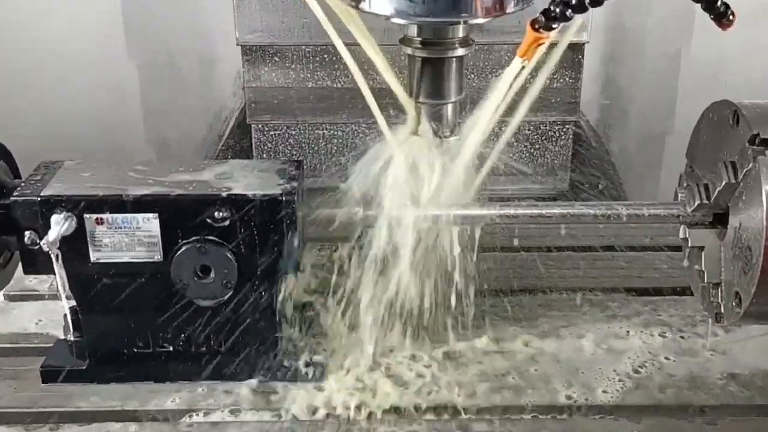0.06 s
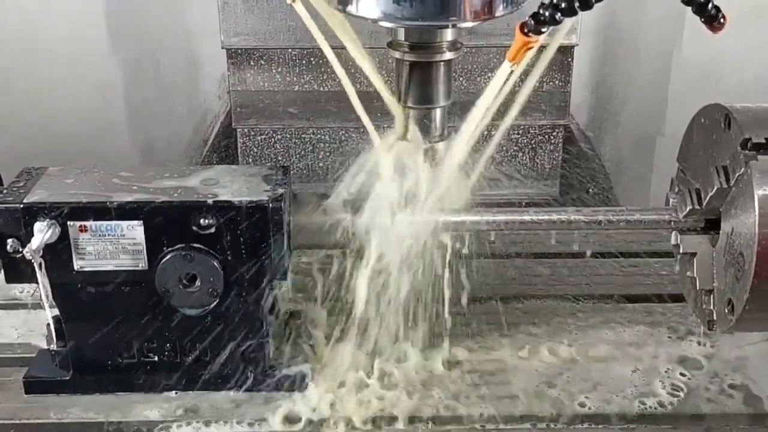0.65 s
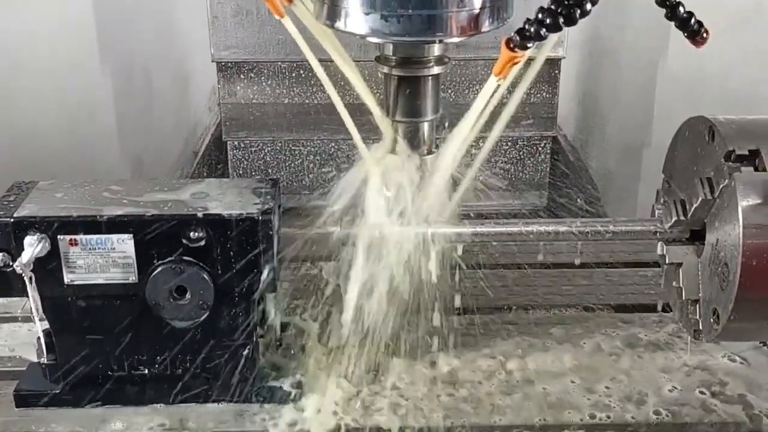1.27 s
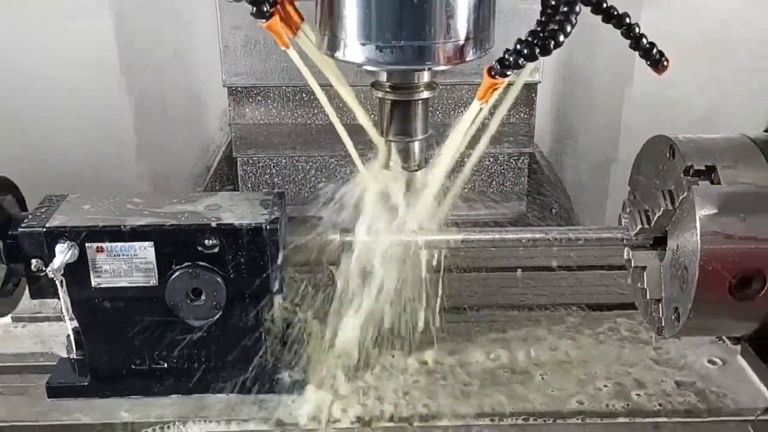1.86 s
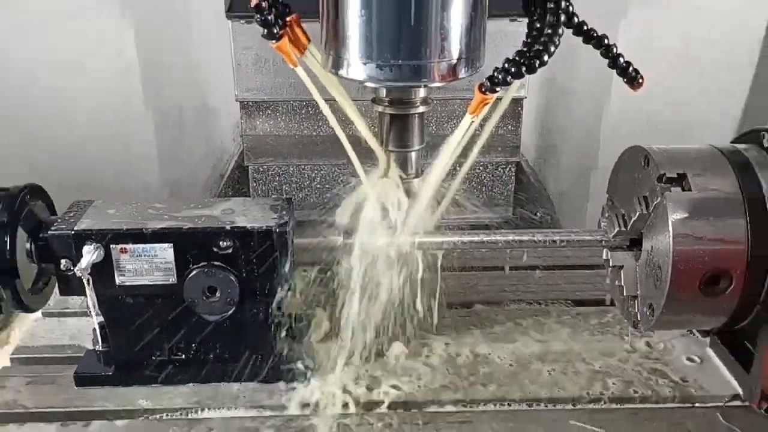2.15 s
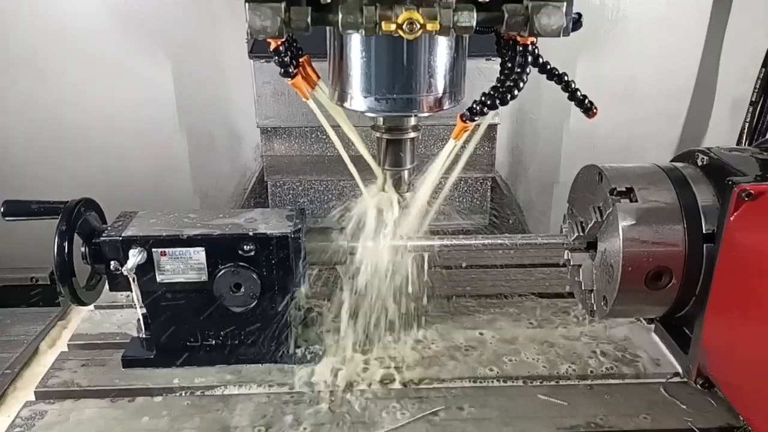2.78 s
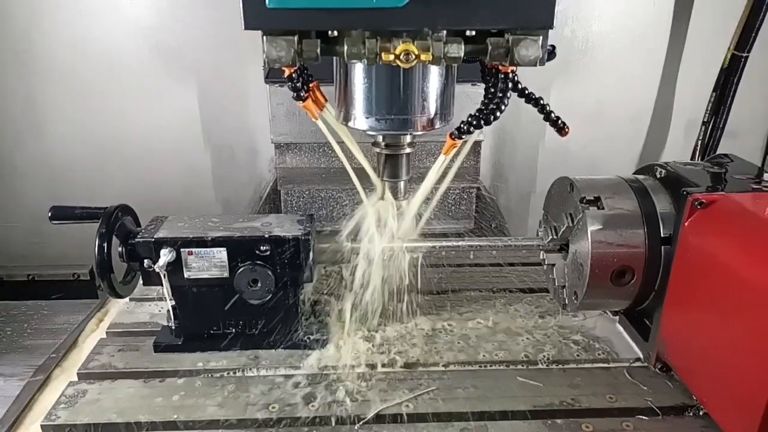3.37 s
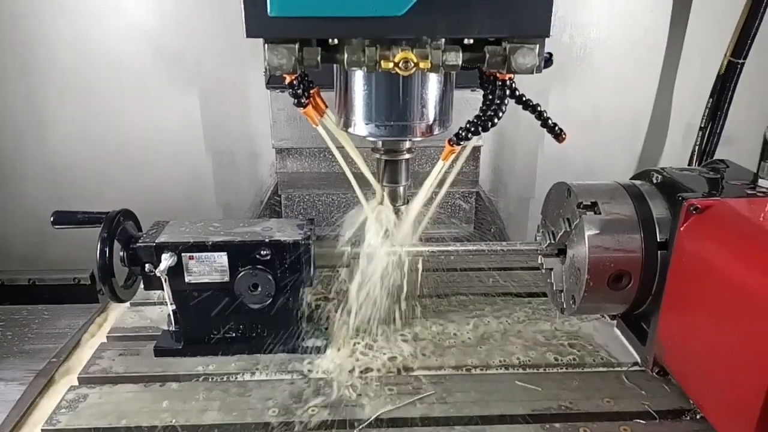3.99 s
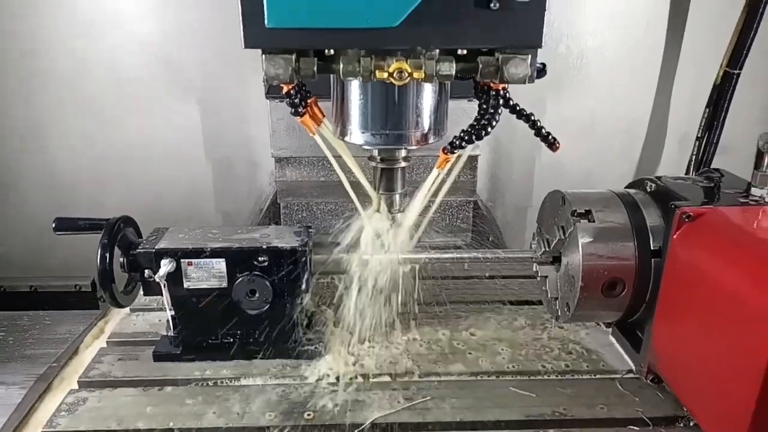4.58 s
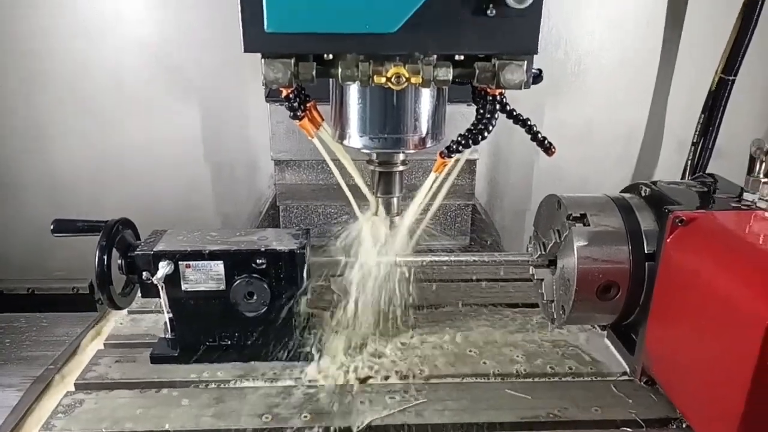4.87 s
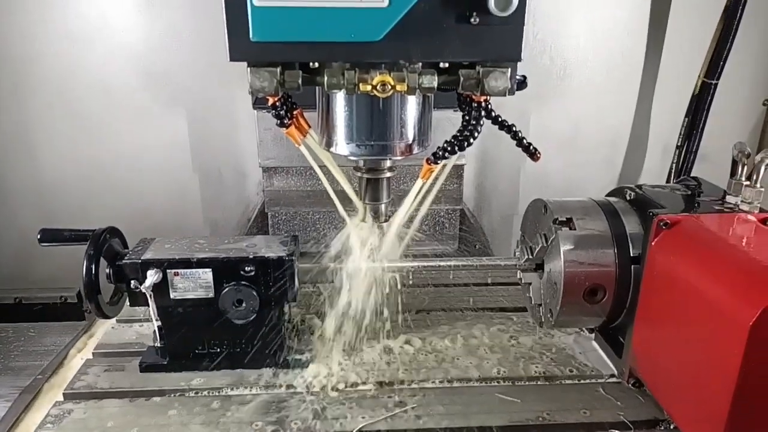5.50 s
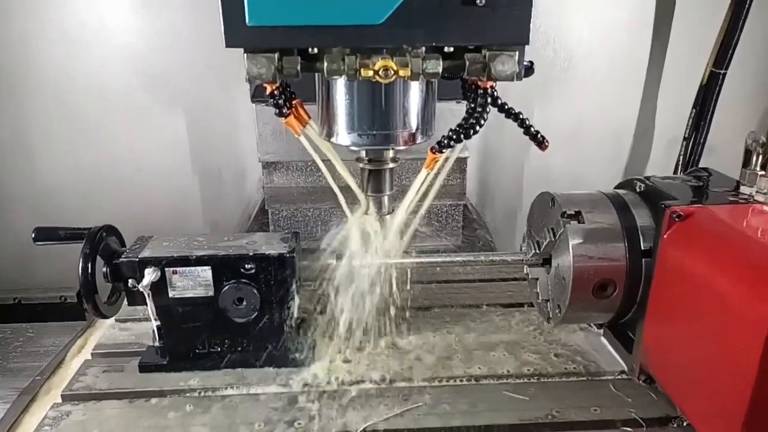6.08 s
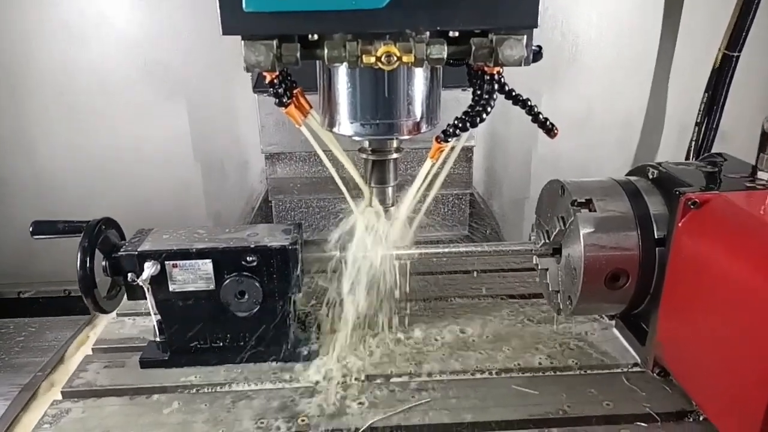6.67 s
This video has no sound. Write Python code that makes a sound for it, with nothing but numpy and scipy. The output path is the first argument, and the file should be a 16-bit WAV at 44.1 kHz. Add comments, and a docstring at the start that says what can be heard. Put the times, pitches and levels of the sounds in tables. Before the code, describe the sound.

Coolant jets hiss and splash on steel over a milling machine's hum, while the cutter adds a rough, high whistle midway.

```python
"""Just outside the open cabinet of a machining centre milling a steel shaft under flood coolant.
The jets hiss, patter and splash on steel; runoff bubbles in the pool and drums on the sheet-metal tray.
Midway the cutter bites: its teeth ring tool and shaft into a rough whistle, blurred by reflections.
Underneath, the pump drones and beats, the motors whine and the frame rumbles."""
import sys
import numpy as np
from scipy import signal
from scipy.fft import rfft, irfft
from scipy.io import wavfile
from scipy.ndimage import uniform_filter1d

SR = 44100
rng = np.random.default_rng(int(sys.argv[2]) if len(sys.argv) > 2 else 0)


def put_to_file(sound):
    """Save the sound as 16-bit audio at rate SR, in the file named by the first command-line argument."""
    columns = np.atleast_2d(sound).T  # one column per channel
    safe = np.clip(columns, -1, 1)
    whole_steps = np.round(safe * 32767)
    wavfile.write(sys.argv[1], SR, whole_steps.astype(np.int16))


N = 297234
TIME = np.arange(N) / SR
FREQS = np.maximum(np.fft.rfftfreq(N, 1 / SR), 1)
TOOTH_HZ = 40.0
TRICKLE_DB = -63.5  # runoff between gushes, before the tray's gain


def spray(flow_db, gain_db=-34.5, treble_hz=9000, follow=0.84, flow_cap_db=6):
    """Fine droplets burst off the spinning tool in a dense, sputtering hiss."""
    # spray spectrum, each side: freq_hz, gain_db
    left_spectrum = [(150, -66), (900, -36), (2000, -6.5), (3400, 3), (4700, -1), (6300, -1), (7300, -1.5),
                     (8600, 1), (10200, -3), (12500, -4), (14500, 0), (15800, -2.5)]
    right_spectrum = [(900, -76), (2000, -11.5), (3400, 3.5), (4700, -1), (6400, 2.5), (7300, -0.5),
                      (8500, -13.5), (10000, -79), (12500, -71), (14500, -1.5), (15800, -16)]
    # top of the hiss dulls as the listener moves back: time_s, gain_db
    treble_gain = [(0, 0.5), (2.5, -1), (3.5, -1), (5.0, -4.5), (6.74, -5)]
    left, right = cabinet(drops(per_s=7500, spread_db=2.5), t60_s=0.097, wet_db=3)
    hiss = unit(np.array([colour(left, left_spectrum), colour(right, right_spectrum)]))
    treble = irfft(rfft(hiss) / (1 + (treble_hz / FREQS) ** 6), N)
    level = undb(gain_db + follow * np.minimum(flow_db, flow_cap_db))
    return (hiss + treble * (undb(curve(treble_gain)) - 1)) * level


def patter(flow_db):
    """Heavier drops slap on shaft and table; long waves reach both sides alike."""
    # drops on steel: freq_hz, gain_db
    spectrum = [(150, -37), (300, 15.5), (420, 4), (470, -4), (560, 7.5), (720, 1.5), (840, 1.5),
                (1100, 7.5), (1250, 4.5), (1370, 6.5), (1520, 5), (2400, 5), (3400, -6), (7000, -7.5)]
    # left-right likeness: freq_hz, correlation
    likeness = [(200, 1), (550, 0.36), (850, -0.071), (1250, -0.072), (1800, -0.14), (2400, 0.48),
                (3400, 0.24)]
    # patter at nominal flow: time_s, level_db
    levels = [(0, -41.5), (2.0, -41.5), (2.7, -43), (2.9, -43), (4.2, -44), (4.6, -43.5), (6.74, -43.5)]
    mid, side = rfft(cabinet(drops(per_s=3000, spread_db=1.5), t60_s=0.14, wet_db=-1.5))
    alike = np.clip(across(likeness), -1, 1)
    mid, side = mid * np.sqrt(1 + alike), side * np.sqrt(1 - alike)
    slaps = irfft(np.array([mid + side, mid - side]), N)
    return unit(colour(slaps, spectrum)) * pan(1.8) * undb(curve(levels) + flow_db)


def flow(waver_db=0.55, sputter_half_s=0.021):
    """Jet strength in dB about nominal: a slight waver and brief sputters."""
    # jets falter (-) or surge (+): time_s, change_db
    sputters = [(0.84, 1.5), (1.25, 2), (1.32, -3.5), (1.59, -2), (1.96, -2.5), (2.13, 1), (2.28, -3.5),
                (2.61, -2.5), (3.12, -1.5), (3.58, 2), (4.09, -1), (4.22, -2.5), (4.33, 1.5), (4.78, -3),
                (5.19, -2), (5.57, -1), (5.78, 2), (6.31, -3)]
    return waver_db * walk(9.7) + sum(db * bump(s, sputter_half_s) for s, db in sputters)


def cutter(gain_db=1.85, fade_s=0.074, squeal_from_db=-45, squeal_full_db=-36):
    """A light cut rasps the tool; a heavy one locks it into a squeal that pulses at every tooth."""
    # chatter as the tool enters, crosses and leaves the steel: time_s, level_db
    chatter = [(1.7, -56), (1.92, -51.5), (2.05, -43.5), (2.19, -46.1), (2.28, -39.5), (2.38, -47.1),
               (2.48, -33.8), (2.59, -42.6), (2.7, -44.5), (2.72, -39.8), (2.8, -36.0), (2.89, -39.6),
               (3.08, -32.1), (3.14, -39.3), (3.41, -32.9), (3.51, -37.0), (3.56, -29.7), (3.69, -36.0),
               (3.71, -32.0), (3.81, -31.0), (3.84, -34.5), (3.86, -30.8), (3.94, -39.6), (3.97, -35.7),
               (4.03, -38.7), (4.06, -35.2), (4.09, -40.7), (4.16, -33.1), (4.19, -40.0), (4.28, -35.7),
               (4.41, -39.1), (4.43, -35.5), (4.49, -38.3), (4.53, -36.3), (4.61, -41.9), (4.69, -34.4),
               (4.8, -39.0), (4.88, -36.8), (4.99, -34.6), (5.06, -37.6), (5.14, -37.6), (5.22, -43.8),
               (5.24, -38.3), (5.34, -44.4), (5.41, -36.4), (5.47, -34.9), (5.51, -40.3), (5.59, -36.1),
               (5.74, -49.0), (5.87, -50.5), (5.95, -58.6)]
    # tool resonance, sagging and recovering with load: time_s, pitch_hz
    pitch = [(2.2, 5429), (2.29, 5433), (2.59, 5414), (2.66, 5437), (2.83, 5420), (2.92, 5431),
             (3.11, 5422), (3.31, 5430), (4.05, 5424), (4.17, 5396), (4.26, 5428), (4.53, 5400),
             (4.63, 5427), (4.73, 5423), (4.92, 5449), (5.04, 5425), (5.59, 5422), (5.69, 5444)]
    chatter_db = curve(chatter)
    locked = np.clip((chatter_db - squeal_from_db) / (squeal_full_db - squeal_from_db), 0, 1)
    tooth = np.cos(2 * np.pi * TOOTH_HZ * TIME)
    turn = np.cos(np.pi * TOOTH_HZ * TIME)  # every other tooth cuts deeper
    voice = settle(locked * whistle() + undb(-6.5) * scrape(width_hz=55))
    carrier = np.exp(2j * np.pi * np.cumsum(curve(pitch)) / SR)
    tool = (voice * carrier).real * undb(locked * (1.5 * tooth + 1.3 * turn))
    engaged = np.clip(np.minimum(TIME - chatter[0][0], chatter[-1][0] - TIME) / fade_s, 0, 1)
    return unit(tool) * pan(-2.4) * engaged * undb(chatter_db + gain_db)


def whistle():
    """Complex envelope of the tool's tone; swirling coolant and reflections make it flutter and waver."""
    sides = [np.exp(1j * (lead_rad + .55 * walk(10) + .35 * walk(45))) * undb(1.5 * walk(40))
             for lead_rad in (0, 1.8)]
    tone = np.array(sides) * np.exp(.55j * walk(26)) * undb(1.3 * walk(70))
    return tone * np.sqrt(2 / np.mean(np.abs(tone) ** 2))


def scrape(width_hz):
    """Complex envelope of a resonance scraped by the teeth; each side gets its own reflections."""
    teeth = undb(3 * np.cos(2 * np.pi * TOOTH_HZ * TIME))
    force = rfft(teeth * rng.standard_normal((2, 2, N)))
    real, imaginary = irfft(force / (1 + 1j * FREQS / width_hz) / (1 + 1j * FREQS / (4 * width_hz)), N)
    return unit(real) + 1j * unit(imaginary)


def settle(ringing, span_s=.05):
    """Self-excited vibration limits itself: slow swings even out, fast roughness stays."""
    power = np.mean(np.abs(ringing) ** 2, axis=0)
    return ringing / np.sqrt(uniform_filter1d(power, int(span_s * SR)))


def shaft(bout_gain_db=3.0, note_hz=3048):
    """The shaft rings along with the cut: grinding bouts in its modes and one thin held note."""
    # bouts in one mode: time_s, pitch_hz, level_db, half_length_s
    bouts = [(2.303, 2985, -44, 0.026), (2.535, 2992, -41.5, 0.04), (2.85, 2990, -45, .03),
             (3.023, 3030, -50, .05), (3.287, 2996, -44, .025), (3.43, 3000, -41, 0.048),
             (3.446, 2410, -49, 0.049), (3.578, 3005, -46, .05), (3.697, 3178, -48, 0.083),
             (3.885, 2990, -42.5, 0.032), (3.94, 3270, -48, 0.1), (4.01, 2998, -40.5, 0.06),
             (4.17, 3000, -43, .035), (4.35, 2360, -50, 0.022), (4.37, 3002, -43, 0.069),
             (4.59, 2990, -44, 0.026), (4.6, 1405, -49, .09), (5.02, 3005, -48, .05),
             (5.263, 3010, -46, 0.045), (5.468, 3035, -47.5, .06)]
    # stretches of the held note: start_s, length_s, level_db
    holds = [(3.3, 0.54, -52), (3.84, 0.6, -46.5), (4.44, 0.22, -51), (4.916, 0.75, -52)]
    modes = sum(undb(db) * bump(s, half_s) * np.exp(2j * np.pi * hz * TIME) for s, hz, db, half_s in bouts)
    ringing = settle(np.exp(.6j * np.array([walk(8), walk(8)])) + .8 * scrape(width_hz=28))
    grind = (ringing * modes).real * undb(3.5 * np.cos(2 * np.pi * TOOTH_HZ * TIME) + 2.2 * walk(30))
    held = sum(undb(db) * gate(start_s, length_s) for start_s, length_s, db in holds)
    note = np.cos(2 * np.pi * note_hz * TIME + .6 * np.array([walk(8), walk(8)])) * undb(2 * walk(20))
    return (grind * undb(bout_gain_db) + held * note) * pan(-0.87)


def tray(runoff_db, gain_db=-0.5):
    """Runoff drums on the sheet-metal tray and rings two low modes."""
    # tray boom: freq_hz, gain_db
    spectrum = [(25, -11), (55, -7), (75, -9), (100, 7), (135, -23), (190, 14.5), (260, 24), (340, 8),
                (450, -8), (650, -32), (900, -37)]
    # drum modes: pitch_hz, width_hz, gain_db
    modes = [(164, 14, 0), (261, 22, -3.5)]
    shared, own = drops(per_s=2000, spread_db=1)[0], drops(per_s=2000, spread_db=1)
    force = shared + undb(-8.5) * own
    boom = unit(colour(force, spectrum)) + undb(-3.5) * unit(ring(force, modes))
    return boom * pan(1.5) * undb(TRICKLE_DB + runoff_db + gain_db)


def runoff():
    """Runoff in dB above its trickle, swelling in gushes."""
    # gushes landing on the tray: start_s, length_s, level_db
    gushes = [(0.027, 0.069, -58), (0.14, 0.1, -53), (0.4, 0.092, -51), (0.82, 0.07, -45),
              (0.89, 0.14, -53), (1.098, 0.055, -49), (1.237, 0.062, -46), (1.386, 0.092, -56),
              (1.49, 0.084, -50.5), (1.726, 0.086, -52), (1.895, 0.19, -52.5), (2.12, 0.15, -52.5),
              (2.298, 0.13, -56), (2.513, 0.087, -54), (2.66, 0.13, -53), (2.828, 0.12, -51),
              (2.983, 0.075, -53), (3.286, 0.052, -54), (3.436, 0.13, -55.5), (3.663, 0.11, -55),
              (3.966, 0.054, -53), (4.15, 0.028, -48), (4.19, 0.048, -51.5), (4.347, 0.106, -53),
              (4.577, 0.1, -48.5), (4.786, 0.1, -58), (4.912, 0.027, -48), (5.14, 0.06, -65),
              (5.274, 0.034, -52), (5.395, 0.046, -51), (5.472, 0.078, -53), (5.677, 0.22, -59.5),
              (5.86, 0.15, -56), (5.997, 0.087, -62), (6.6, 0.043, -53)]
    surge = sum(undb(db - TRICKLE_DB) * gate(start_s, length_s) for start_s, length_s, db in gushes)
    return 20 * np.log10(np.hypot(1, surge))


def splashes():
    """Wads of coolant slap the shaft with a soft, hollow splash."""
    # slaps: time_s, level_db, half_length_s
    slaps = [(0.475, -46, .015), (0.67, -41, 0.014), (1.245, -42, .02), (1.85, -49, 0.034),
             (2.13, -48, .045), (4.33, -53, .02), (4.95, -50, 0.043)]
    # splash spectrum: freq_hz, gain_db
    spectrum = [(900, -23), (1600, -8), (2060, -8), (2230, -10), (2410, -4), (2600, -10), (4000, -29)]
    return bumps(slaps) * unit(colour(drops(per_s=3600, spread_db=-2.0), spectrum))


def glugs(gain_db=-1.0, count=12, spread_oct=.3):
    """An air pocket breaks up in the pool: a quick cluster of like-sized bubbles, strongest midway."""
    # air pockets: time_s, level_db, centre_hz, half_length_s
    pockets = [(0.064, -49, 522, .025), (0.192, -47, 445, 0.026), (0.391, -55, 444, .025),
               (0.513, -51, 440, 0.032), (0.62, -48.5, 443, 0.033), (0.857, -60, 620, .03),
               (1.161, -49, 452, 0.04), (1.268, -48, 440, .025), (1.423, -54, 450, 0.031),
               (1.528, -50, 530, 0.026), (1.76, -51.5, 515, .035), (2.1, -51, 438, 0.029),
               (2.198, -52, 436, 0.032), (2.429, -54, 525, 0.035), (2.55, -53, 515, .025),
               (2.67, -52, 432, 0.031), (2.996, -51, 635, .02), (3.44, -51, 517, 0.026),
               (3.593, -50, 514, 0.023), (3.904, -50, 520, 0.023), (4.33, -56, 443, 0.026),
               (4.456, -54, 620, .025), (4.588, -49.5, 430, 0.028), (4.696, -53, 520, 0.044),
               (4.95, -53, 440, .04), (5.38, -51, 458, 0.027), (5.749, -49.5, 460, 0.027),
               (5.882, -53, 560, 0.037), (5.978, -49.5, 441, .03), (6.104, -52, 453, .025),
               (6.178, -47, 533, 0.016), (6.279, -51, 623, 0.019), (6.43, -53, 630, 0.028),
               (6.568, -47.5, 440, .025), (6.722, -50, 530, .025)]
    out = np.zeros((2, N))
    for time_s, db, hz, half_s in pockets:
        cluster = np.zeros((2, N))
        for slot in np.linspace(-1.5, 1.5, count):
            jitter, pitch, place = rng.uniform(-1, 1, 3)
            offset = slot + jitter / 8
            ping = bubble(hz * 2 ** (spread_oct * pitch)) * np.exp(-offset ** 2 / 2)
            add(cluster, ping * pan(4 * place), time_s + offset * half_s)
        out += cluster * undb(db + gain_db) * np.sqrt(4 * half_s * SR / np.sum(cluster ** 2))
    return out


def gurgle(flow_db, count=800, low_hz=380, high_hz=900, follow=0.52):
    """Small bubbles keep ringing all over the pooled coolant."""
    # fine bubbling at nominal flow: time_s, level_db
    levels = [(0, -56.5), (1.3, -49), (2.7, -52.5), (2.87, -70), (3.27, -62), (3.5, -53), (4.15, -57.5),
              (4.7, -51), (5.2, -56), (5.9, -53), (6.33, -66), (6.7, -53.5)]
    out = np.zeros((2, N))
    for when, pitch, strength, place in rng.random((count, 4)):
        ping = bubble(low_hz * (high_hz / low_hz) ** pitch) * undb(12 * strength)
        add(out, ping * pan(8 * (place - .5)), when * N / SR)
    return unit(out) * undb(curve(levels) + follow * flow_db)


def bubble(hz, cycles=11, glide=0.086):
    """One bubble rings briefly and rises in pitch."""
    t = TIME[:3000]
    age = t * hz / cycles
    return np.sin(2 * np.pi * hz * t * (1 + glide * age / 2)) * np.exp(-2 * age) * (1 - np.exp(-t * hz))


def thumps():
    """The heaviest slugs of coolant shake the whole tray."""
    # slugs: time_s, level_db, half_length_s
    slugs = [(0.95, -55, .04), (1.416, -57, 0.023), (2.05, -48, 0.024), (2.747, -64, 0.028)]
    # thud spectrum: freq_hz, gain_db
    spectrum = [(30, -30), (55, -14), (73, 8), (100, -5), (170, 15), (400, -54)]
    return bumps(slugs) * unit(colour(rng.standard_normal(N), spectrum))


def pump(rough_db=1.0, throb_hz=8.31, throb_db=2.5, throb_peak_s=0.125):
    """Close pump tones beat into a rough drone that throbs evenly and comes in swells."""
    # pump tones: pitch_hz, relative_db
    tones = [(288.1, -5), (292.0, -2), (300.4, 0), (321.2, -9)]
    # drone between swells: time_s, level_db
    levels = [(0, -56), (2.0, -52), (3.6, -54.5), (4.4, -55.5), (5.0, -47), (5.6, -54), (6.5, -52.5)]
    # swells: time_s, level_db, half_length_s
    swells = [(0.102, -43, 0.012), (0.19, -44, 0.0071), (0.387, -40.5, 0.034), (0.62, -49, 0.014),
              (0.852, -38.5, 0.013), (0.944, -45, 0.025), (1.111, -41.5, 0.018), (1.254, -48, 0.017),
              (1.493, -45, 0.016), (1.672, -43, 0.02), (1.826, -47, 0.015), (1.923, -49, 0.02),
              (2.155, -42.5, 0.03), (2.39, -43.5, .024), (2.56, -42, .022), (2.8, -41, 0.012),
              (2.887, -46, 0.012), (3.116, -47, 0.045), (3.455, -45.5, 0.029), (3.708, -42.5, 0.012),
              (3.87, -46, 0.022), (3.963, -46, 0.026), (4.12, -37.5, 0.015), (4.21, -45, 0.041),
              (4.35, -43, 0.029), (4.453, -41, 0.02), (4.6, -42, 0.015), (4.843, -43.5, 0.052),
              (5.175, -45, 0.017), (5.264, -45.5, 0.018), (5.427, -41, 0.014), (5.52, -40.5, 0.025),
              (5.68, -42, 0.017), (5.772, -41, 0.03), (5.912, -38, 0.026), (6.13, -47, 0.071),
              (6.72, -42, 0.012)]
    beating = sum(undb(db) * np.exp(2j * np.pi * (hz * TIME + rng.random())) for hz, db in tones)
    flattened = beating.real / (np.abs(beating) + 0.1) ** .85
    drone = unit(flattened * undb(rough_db * walk(55)))
    throb = undb(curve(levels) + throb_db * np.cos(2 * np.pi * throb_hz * (TIME - throb_peak_s)))
    return drone * pan(1.7) * np.hypot(throb, bumps(swells))


def motors(waver_rad=.25, flutter_db=2.0):
    """Spindle drive and motors give thin, steady whines."""
    # whines: pitch_hz, level_db, left_minus_right_db, left_lead_rad
    whines = [(419.2, -63, 0, .1), (642.4, -64.5, -2, -.7), (963.6, -59.5, 2, -.8),
              (1076.4, -52.5, 2, -2.5), (1284.8, -70, 5, .6), (1359.6, -48.5, 4, 2.8),
              (2719.2, -63, -2, .4), (2798.9, -62.5, -1, -1.2), (4078.8, -63, 6, 1.4)]
    # all whines, dipping midway and then recovering: time_s, gain_db
    gains = [(0, 1), (3.2, -2), (4.5, 0.5), (6.74, 0.6)]
    out = 0
    for hz, db, pan_db, lead_rad in whines:
        waver, flutter = waver_rad * walk(8), flutter_db * walk(14)
        phase = 2 * np.pi * (hz * TIME + rng.random()) + waver + np.array([[lead_rad], [-lead_rad]]) / 2
        out = out + np.sqrt(2) * np.cos(phase) * pan(pan_db) * undb(db + flutter)
    return out * undb(curve(gains))


def rumble(level_db=-75, side_db=-4):
    """The machine frame rumbles faintly throughout."""
    # frame spectrum: freq_hz, gain_db
    spectrum = [(20, 10), (45, 1), (80, -4), (120, -4), (250, -34)]
    mid, side = colour(rng.standard_normal((2, N)), spectrum)
    return unit(mid + undb(side_db) * np.array([side, -side])) * undb(level_db)


def drops(per_s, spread_db):
    """Random impacts of uneven size, independent left and right."""
    hit = rng.random((2, N)) < per_s / SR
    size = undb(spread_db * np.minimum(rng.exponential(size=(2, N)), 5))
    return unit(hit * size * rng.standard_normal((2, N)))


def cabinet(x, t60_s, wet_db):
    """Direct sound plus the cabinet's diffuse tail, independent left and right."""
    keep = np.exp(-2 * np.log(1000) / (t60_s * SR))
    energy = signal.lfilter([1 - keep], [1, -keep], x ** 2)
    return unit(x + undb(wet_db) * np.sqrt(energy) * rng.standard_normal((2, N)))


def ring(x, modes):
    """Resonator bank; neighbouring modes swing in opposite directions."""
    response = sum((-1) ** k * undb(db) / (1 + 1j * (FREQS ** 2 - hz ** 2) / (FREQS * width_hz))
                   for k, (hz, width_hz, db) in enumerate(modes))
    return irfft(rfft(x) * response, N)


def colour(x, spectrum):
    """Filter by a (freq_hz, gain_db) table."""
    return irfft(rfft(x) * undb(across(spectrum)), N)


def across(table):
    """A (freq_hz, value) table at every frequency."""
    hz, value = np.transpose(table)
    return np.interp(np.log(FREQS), np.log(hz), value)


def curve(table):
    """A (time_s, value) table at every sample."""
    return np.interp(TIME, *np.transpose(table))


def walk(rate_hz):
    """Smooth random drift, rms 1."""
    return unit(irfft(rfft(rng.standard_normal(N)) * np.exp(-(FREQS / rate_hz) ** 2), N))


def gate(start_s, length_s, attack_s=0.042, release_s=0.022):
    """Attack, hold and release, with ramps centred on the ends."""
    attack = np.clip((TIME - start_s) / attack_s + .5, 0, 1)
    release = np.clip((start_s + length_s - TIME) / release_s + .5, 0, 1)
    return attack * release


def bump(time_s, half_s):
    """Gaussian rise and fall, height 1."""
    return np.exp(-np.minimum(((TIME - time_s) / half_s) ** 2 / 2, 40))


def bumps(table):
    """Envelope from a (time_s, level_db, half_length_s) table."""
    return sum(undb(db) * bump(time_s, half_s) for time_s, db, half_s in table)


def add(out, sound, time_s):
    """Mix in a short sound."""
    start = int(np.clip(time_s * SR, 0, N - 1))
    out[:, start:start + sound.shape[-1]] += sound[..., :N - start]


def pan(db):
    """Stereo gains for a left-minus-right level."""
    return undb(np.array([[db], [-db]]) / 2)


def undb(db):
    """Decibels to gain."""
    return 10 ** (np.asarray(db) / 20)


def unit(x):
    """Scale to rms 1."""
    return x / np.sqrt(np.mean(x ** 2))


def scene():
    """Coolant, machine and cut together."""
    flow_db = flow()
    jets = spray(flow_db) + patter(flow_db) + splashes()
    drain = gurgle(flow_db) + glugs() + tray(runoff()) + thumps()
    return jets + drain + rumble() + pump() + motors() + cutter() + shaft()


def record(dry, low_cut_hz=46, top_hz=15950):
    """Thin the deep bass and cut the top steeply."""
    thinned = signal.sosfilt(signal.butter(2, low_cut_hz, "high", fs=SR, output="sos"), dry)
    return signal.sosfilt(signal.ellip(12, .2, 90, top_hz, fs=SR, output="sos"), thinned)


dry = scene()
out = record(dry)
put_to_file(out)
```